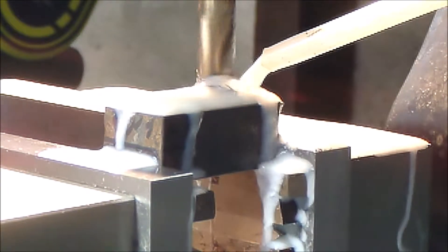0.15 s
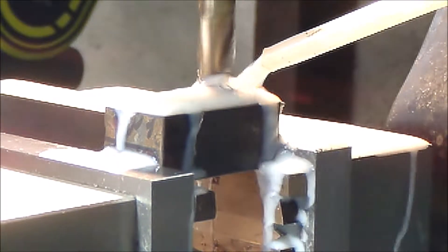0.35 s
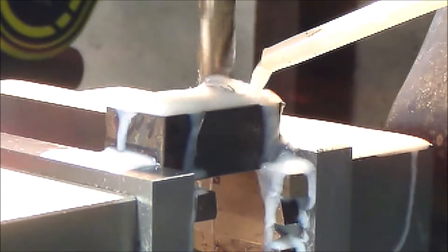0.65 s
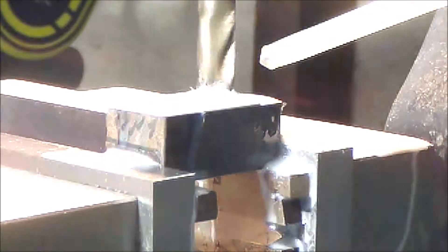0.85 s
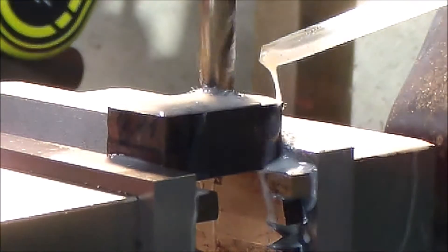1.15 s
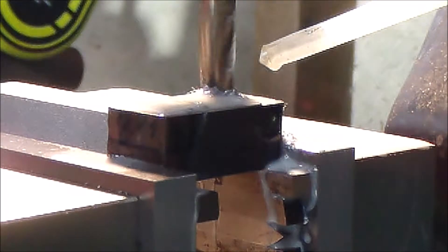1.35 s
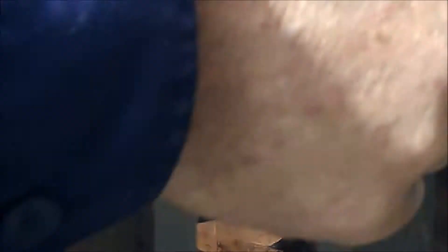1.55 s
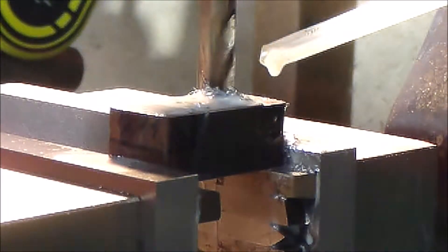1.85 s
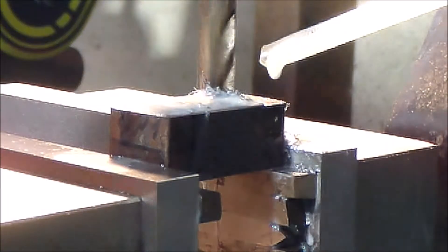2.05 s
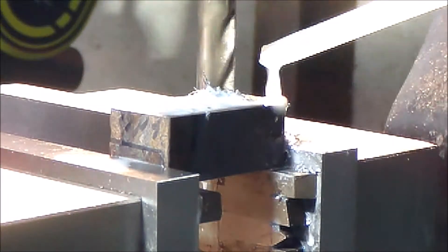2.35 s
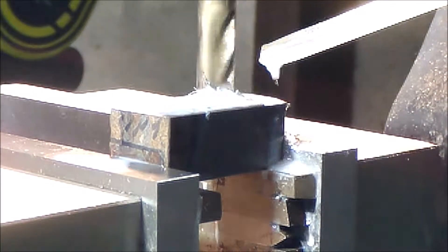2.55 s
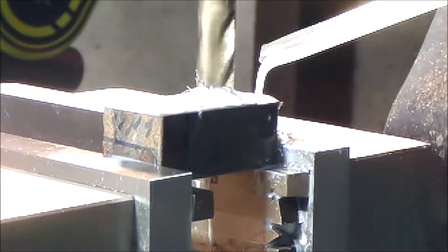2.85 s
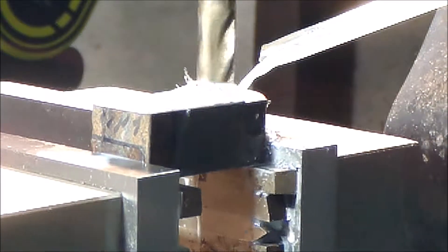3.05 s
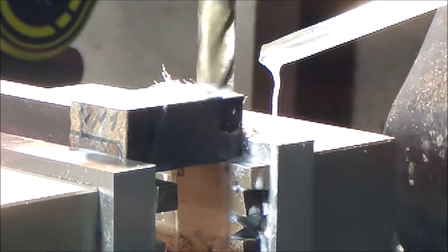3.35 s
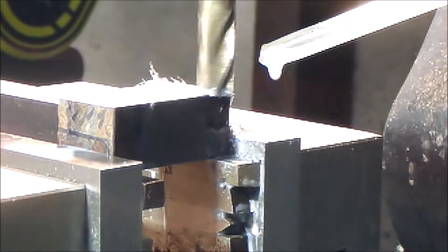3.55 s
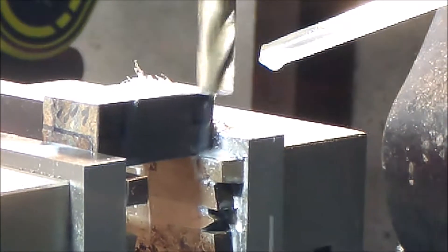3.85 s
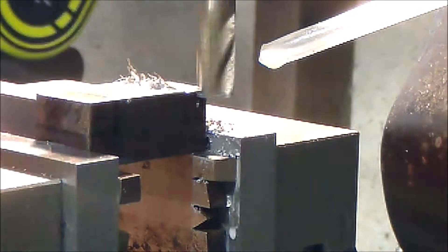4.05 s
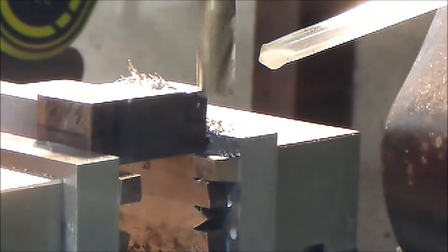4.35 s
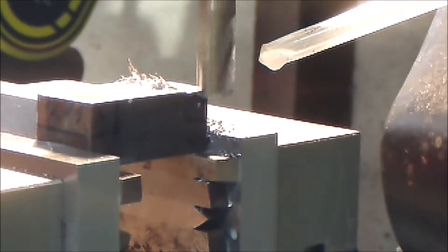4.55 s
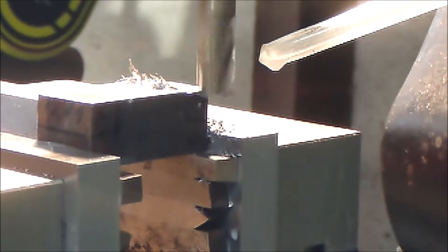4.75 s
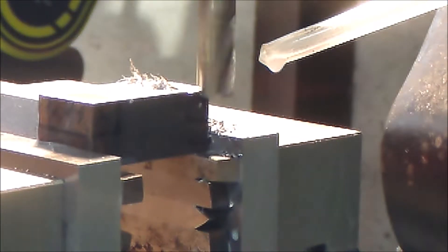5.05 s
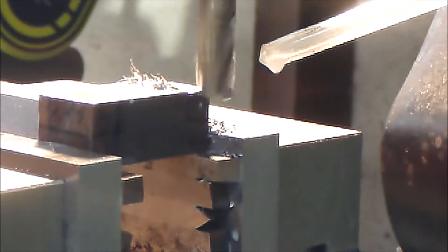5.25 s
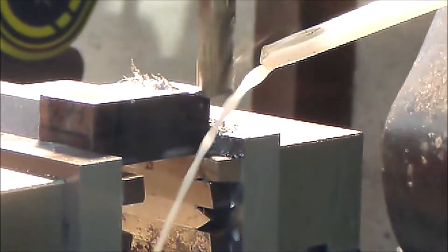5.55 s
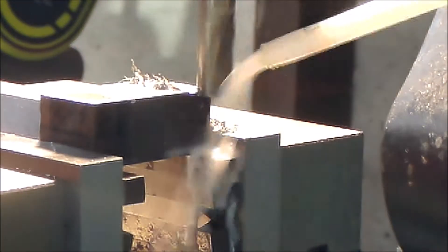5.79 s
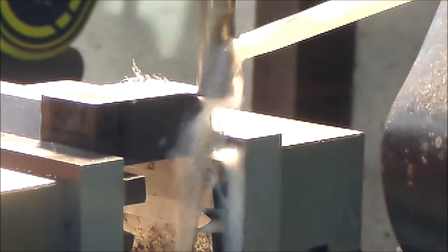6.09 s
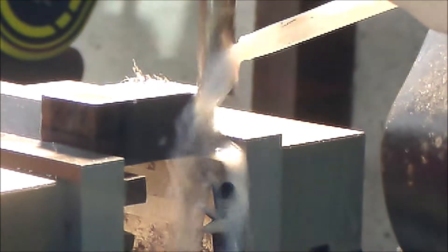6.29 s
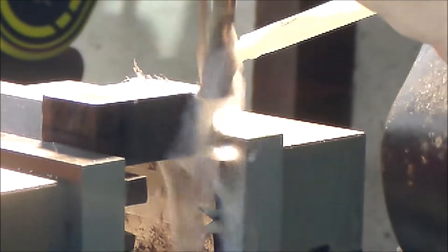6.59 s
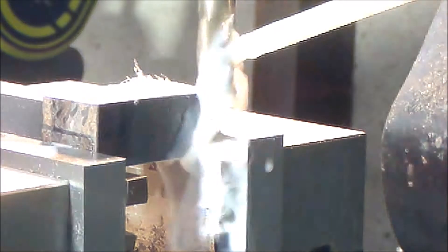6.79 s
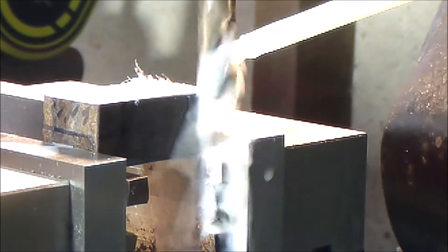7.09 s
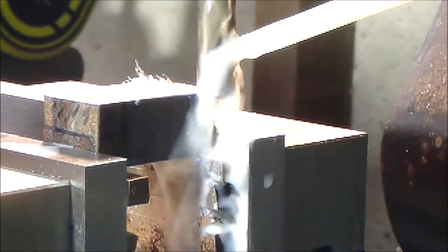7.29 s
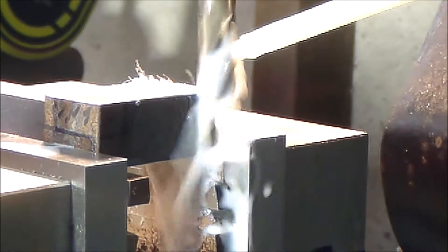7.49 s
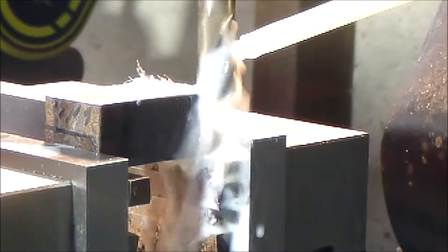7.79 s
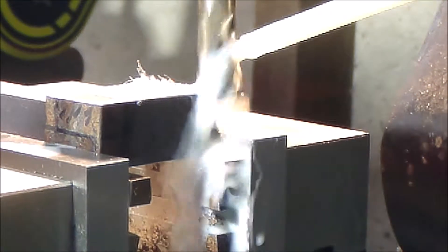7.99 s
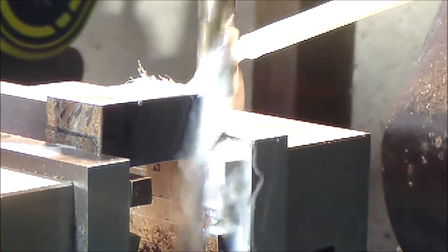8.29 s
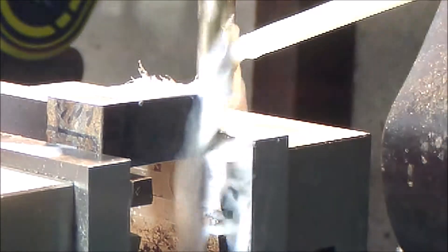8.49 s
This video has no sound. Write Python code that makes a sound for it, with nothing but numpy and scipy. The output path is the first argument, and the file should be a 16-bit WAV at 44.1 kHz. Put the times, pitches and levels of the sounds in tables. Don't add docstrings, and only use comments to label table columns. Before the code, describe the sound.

A loud milling machine whines and roars steadily in a workshop; a hand crank rattles, then the cutter bites metal with a ringing scrape.

```python
import sys
import numpy as np
from scipy import signal
from scipy.io import wavfile
from scipy.ndimage import uniform_filter1d

SR = 44100
rng = np.random.default_rng(int(sys.argv[2]) if len(sys.argv) > 2 else 0)


def file_out(sig):
    cols = np.atleast_2d(sig).T
    lim = np.clip(cols, -1, 1)
    pcm = np.round(lim * 32767).astype(np.int16)
    wavfile.write(sys.argv[1], SR, pcm)


def gain_from_db(level_db):
    decades = np.asarray(level_db, float) / 20
    return 10 ** decades


N = 380583
T = np.arange(N) / SR
PULL_HZ = 99.73


def evened(x):
    return x / np.sqrt(np.mean(x ** 2) + 1e-20)


def read(points, hz):
    point_hz, value = np.transpose(points)
    return np.interp(np.log(hz + 1), np.log(point_hz + 1), value)


def curves(rows):
    start_s, *columns = np.transpose(rows)
    return [np.interp(T, start_s, column) for column in columns]


def drift(hz):
    knots = rng.standard_normal(900)
    return np.interp(T * hz, np.arange(900), knots) * 1.2


def gate(start, length, rise, fall):
    return np.clip(np.minimum((T - start) / rise, 1 + (start + length - T) / fall), 0, 1)


def arch(start, length, blunt):
    return np.sin(np.pi * np.clip((T - start) / length, 0, 1)).clip(0) ** blunt


def tone(hz, db, waver_db, waver_hz, wobble):
    phase = 2 * np.pi * (np.cumsum(hz * np.ones(N)) / SR + rng.random())
    phase = phase + wobble * drift(waver_hz)
    return np.sqrt(2) * gain_from_db(db + waver_db * drift(waver_hz)) * np.sin(phase)


def bumps(modes, hz):
    return [(1 / (1 + (2 * (hz - mode_hz) / width_hz) ** 2), db) for mode_hz, width_hz, db in modes]


def bumps_db(modes, hz):
    return sum(bell * db for bell, db in bumps(modes, hz))


def noise(shape_db, patchy_db):
    hz = np.fft.rfftfreq(2048, 1 / SR)
    real, imaginary, patches = rng.standard_normal((N // 512 + 5, 1025, 3)).T
    patches = uniform_filter1d(patches, size=9, axis=0)
    patches = evened(uniform_filter1d(patches, size=6, axis=1))
    spectra = (real + 1j * imaginary) * gain_from_db(shape_db(hz)[:, None] + patchy_db * patches)
    return evened(signal.istft(spectra, nperseg=2048, noverlap=1536)[1][:N])


def gears(mesh_hz, table, moved):
    total = 0
    for multiple, *levels_db, change_db in table:
        for side, db in zip((0, -1, 1), levels_db):
            hz = multiple * mesh_hz + side * PULL_HZ
            total = total + tone(hz, db + change_db * moved, waver_db=0.34, waver_hz=9, wobble=0.22)
    return total


# start_s, first_mesh_hz, table_moved (0-1, how far aside)
GEAR_SPEED = [(0, 583.3, 0), (2.5, 583.2, 0), (4.2, 583.2, .2), (4.7, 582.6, 1), (5.6, 582.5, 1),
              (6.5, 582.9, 1), (8.63, 583.1, 1)]
# multiple, level_db, side_below_db, side_above_db, change_db (once the table has moved)
FIRST_MESH = [(3, -55, -45, -40.5, 2.5), (4, -25, -33, -39, 1), (5, -39, -45, -72, 2),
              (6, -39, -53, -46, -5), (7, -47.5, -51, -63, 0.5), (8, -47.5, -55, -77, -5),
              (9, -37.5, -44, -51, 0), (10, -34.5, -50.5, -51, 0.5), (11, -78, -78, -64, -1),
              (13, -69, -53.5, -68, -5)]
SECOND_MESH = [(2, -52, -57.5, -75, 0.5), (3, -53.5, -63.5, -57.5, -3), (4, -43, -61, -45, -12),
               (5, -28.5, -33.5, -36, 0.5), (6, -48, -49, -43, 5.5), (7, -59, -42, -41.5, -2),
               (8, -41.5, -65, -47, -4.5), (9, -51, -52, -60, -9)]
# pitch_hz, level_db, change_db (once the table has moved)
BEARING_TONES = [(1394, -53.0, 1.0), (1550, -58.0, -4.0), (2110, -40.0, 5.0), (2374, -41.0, -1.0),
                 (2584, -44.0, 1.0), (3401, -44.0, -10.0), (3784, -45.0, -2.0), (4533, -56.0, -2.0),
                 (4662, -54.0, 2.0), (4945, -47.0, 1.0), (5635, -42.0, 0.0), (5768, -44.0, 4.0),
                 (6130, -47.0, 2.0), (7480, -52.0, 3.0)]


def gear_whine():
    mesh_hz, moved = curves(GEAR_SPEED)
    second_hz = mesh_hz * .7065
    whine = gears(mesh_hz, FIRST_MESH, moved) + gears(second_hz, SECOND_MESH, moved)
    for hz, db, change_db in BEARING_TONES:
        whine += tone(hz, db + change_db * moved, waver_db=3.0, waver_hz=15, wobble=0.41)
    return whine


# pitch_hz, level_db (per Hz)
HEAD_ROAR = [(760, -47), (1300, -26), (1520, -25), (1620, -12), (1760, -13.5), (2020, 0), (2210, -10.5),
             (2280, -6), (2560, -6.5), (3400, -13.5), (4410, -21), (5780, -6.5), (8160, -24), (9250, -22),
             (15800, -36)]
# pitch_hz, width_hz, level_db
COVERS = [(765, 54, 7.5), (1608, 120, 2.5), (2097, 360, -4), (3005, 240, 3.5), (5265, 160, 4),
          (5960, 220, 2.5), (9430, 540, 5), (12020, 1140, 5.5)]
# pitch_hz, width_hz, level_db
NEARBY_WALLS = [(1954, 120.0, 6.5), (1973, 150, -7), (3850, 250.0, -4.5), (4060, 100.0, 6.5), (4270, 52, 7),
                (4900, 450, 0.5), (4800, 150.0, 5), (4855, 150, -7), (5670, 290, 4), (5950, 230.0, -8),
                (6340, 680, 1), (7200, 260.0, -5), (8910, 64, 10), (9260, 190, 1.5), (9120, 680, -3),
                (9930, 40, 9.5), (10800, 830, -5), (10560, 114, 6.5), (12220, 160, 3.5), (13500, 210, 6),
                (14400, 81, 5), (13700, 180.0, 3.5), (14150.0, 100.0, 4.8), (14830.0, 370, 5)]


def head_roar():
    moved = curves(GEAR_SPEED)[1]
    strain = gain_from_db(-24.5) + gain_from_db(-42) * cranking() + gain_from_db(-47) * moved
    grain_db = 1.7 * evened(uniform_filter1d(rng.standard_normal(1025), size=3))
    grain_db *= np.clip(np.linspace(-.6, 4, 1025), .25, 1)
    roar = noise(lambda hz: read(HEAD_ROAR, hz) + grain_db + bumps_db(COVERS + NEARBY_WALLS, hz),
                 patchy_db=1.03)
    pull = 2 * np.pi * PULL_HZ * T
    throb = 1 + 0.11 * np.cos(pull) + .08 * np.cos(3 * pull)
    return strain * gain_from_db(0.49 * drift(8)) * throb * roar


# pitch_hz, level_db (per Hz)
COLUMN = [(15, -66), (25, -35), (123, -17), (290, -18), (394, -4.5), (460, -18), (585, -15.5), (810, -7),
          (897, -7), (1220, -4.5), (1500, -6.5), (1950, -37), (3300, -120)]


def column_rumble():
    return gain_from_db(-45) * noise(lambda hz: read(COLUMN, hz) + bumps_db(COVERS, hz), patchy_db=1.9)


# pitch_hz, level_db (over load)
FEED_MOTOR = [(161.5, -5), (188.4, -0.5), (237.5, -.5), (1130, 10)]
# pitch_hz, level_db (over load)
LEAD_SCREW = [(318.5, 1), (345, 4.5), (478, 7.5), (557, -3), (640.6, 4.5), (753.7, 6)]
# pitch_hz, level_db (per Hz)
FEED_GROWL = [(60, -36), (150, -24), (290, -21), (330, -3.5), (400, 7.5), (480, -1.5), (530, -8.5),
              (900, -8), (1400, -28.5)]
# start_s, length_s (motor runs)
FEED_ON = [
    (-.8, 1.53),
    (4.765, 5),
]
# growl_db, tones_db
FEED_LEVELS = [
    (-50, -61.5),
    (-45.5, -59.5),
]


def feed():
    motor, screw = [sum(tone(hz, db, waver_db=2.5, waver_hz=7, wobble=0.21) for hz, db in table)
                    for table in (FEED_MOTOR, LEAD_SCREW)]
    growl = noise(lambda hz: read(FEED_GROWL, hz), patchy_db=1.0)
    jolt = gain_from_db(-43.5) * arch(2.83, 0.31, 2)
    out = growl * (gain_from_db(-66.5) + jolt + gain_from_db(-63) * cranking())
    take_up_s, coast_s, run_up_s, run_down_s, clutch_s = .12, .1, .16, .45, .04
    for (start, length), (growl_db, tones_db) in zip(FEED_ON, FEED_LEVELS):
        table = gate(start + take_up_s, length + coast_s - take_up_s, run_up_s, run_down_s) ** 2
        motor_on = gate(start, length, clutch_s, clutch_s)
        out = out + table * gain_from_db(growl_db) * growl
        out = out + gain_from_db(tones_db) * (table * screw + motor_on * motor)
    return out


# start_s, length_s, level_db
STEADY_HUMS = [
    (0.03, .8, -48.5),
    (.8, 1.45, -48),
    (2.25, .38, -39.5),
    (2.87, .21, -44),
    (3.92, .8, -50),
]
# start_s, length_s, top_db
HUM_SWELLS = [
    (4.91, .3, -38.5),
    (5.15, .78, -36.5),
    (5.84, 1.09, -35),
    (6.92, 1.0, -37),
    (7.94, 1.0, -36),
]


def hum():
    held = np.max([gain_from_db(db) * gate(start, length, .02, .09) for start, length, db in STEADY_HUMS], axis=0)
    swell = np.max([gain_from_db(db) * arch(start, length, .6) for start, length, db in HUM_SWELLS], axis=0)
    steady_tone = tone(399.6, 0, waver_db=-1.6, waver_hz=20, wobble=0.066)
    feeding_tone = tone(4 * PULL_HZ, 0, waver_db=0.4, waver_hz=21.34, wobble=.12)
    return held * steady_tone + swell * feeding_tone


# start_s, level_db, fade_s (time to fall 60 dB), scrape_s (length of the scrape)
CHIP_SNAPS = [
    (.678, -15, .03, .001),
    (2.446, -15.5, .07, .009),
]
# pitch_hz, level_db (per Hz)
SNAP_COLOUR = [(300, -23), (1300, -18), (2200, 4.5), (4000, -19), (5800, -8), (6700, -7.5), (8000, -6),
               (12000, -7.5), (16000, -12)]


def chips():
    crack = noise(lambda hz: read(SNAP_COLOUR, hz), patchy_db=5.5)
    shape = np.zeros(N)
    for start, db, fade_s, scrape_s in CHIP_SNAPS:
        tail = gain_from_db(db - 60 * np.clip(T - start - scrape_s, 0, 1) / fade_s)
        shape += (T > start) * tail * np.clip((T - start) / 0.00047, 0, 1)
    return signal.sosfilt(signal.butter(2, 600, "high", fs=SR, output="sos"), crack * shape)


# start_s, pitch_hz, level_db, fade_s (time to fall 60 dB)
KNOCK_TONES = [(5.922, 355, -22, .07), (5.922, 430, -26, .06), (2.4455, 2200, -10, .07),
               (2.446, 1900, -20, .04), (2.4468, 6600, -12, .05), (2.452, 7100, -14, .05),
               (.678, 2250, -25, .03), (.6783, 6400, -8, .016), (2.848, 2250, -17, .06),
               (2.89, 2950, -19, .05), (3.925, 2500, -15, .05)]


def knocks():
    total = np.zeros(N)
    for start, hz, db, fade_s in KNOCK_TONES:
        age = np.clip(T - start, 0, 1)
        build_up = np.sin(np.pi / 2 * np.clip(age * hz / 4, 0, 1)) ** 2
        total += gain_from_db(db - 60 * age / fade_s) * np.sin(2 * np.pi * hz * age) * build_up
    return total


# start_s, tooth_rate_hz
HAND_SPEED = [
    (2.76, 410),
    (2.95, 570),
    (3.06, 655),
    (3.33, 818),
    (3.55, 695),
    (3.72, 680),
    (3.93, 417),
    (3.98, 385),
]


def cranking():
    start, end = HAND_SPEED[0][0], HAND_SPEED[-1][0]
    return gate(start, end - start, .03, .01)


# middle_s, half_length_s, speed_lost (share)
HAND_CATCHES = [
    (2.857, .045, .235),
    (2.995, .035, .13),
    (3.47, .1, .14),
    (3.625, .065, .125),
]
# multiple, level_db
LOW_TEETH = [(1, 0), (1.28, -10), (2, 2)]
HIGH_TEETH = [(3, -12), (4, -6), (5, -3), (6, 3), (7, -8), (8, -3), (12, -6), (15, -10), (19, -11)]
# pitch_hz, width_hz, level_db
SADDLE_RINGS = [(760, 640, -3), (417, 200, 8), (953, 65, 5), (1400, 400, 1.5), (2220, 200, 14),
                (2600, 120, 8), (2960, 130, 11), (3314, 170, 11), (3770, 200, 6), (6050, 800, 11),
                (8300, 1500, 0), (12200, 500, -5), (14500, 2000, 7)]


def crank():
    slowed = 1 - sum(lost * arch(middle - half, 2 * half, 2) for middle, half, lost in HAND_CATCHES)
    tooth_hz = curves(HAND_SPEED)[0] * slowed * (1 + .007 * drift(40))
    effort_db = -44 + 24 * np.log2(tooth_hz / 700)
    chatter_db = -43.5 + 1.5 * drift(14)
    orders = [(multiple, db + effort_db, .9) for multiple, db in LOW_TEETH]
    orders += [(multiple, db + chatter_db, 1.1) for multiple, db in HIGH_TEETH]
    teeth = 0
    for multiple, db, wobble in orders:
        hz = multiple * tooth_hz
        ringing = sum(bell * gain_from_db(mode_db) for bell, mode_db in bumps(SADDLE_RINGS, hz))
        teeth = teeth + tone(hz, db, waver_db=3.3, waver_hz=80, wobble=wobble) * ringing
    return teeth * cranking()


# start_s, level_db
BITE = [
    (5.12, -43),
    (5.18, -34),
    (5.6, -27),
    (6.2, -25.5),
    (7.8, -23.8),
    (8.1, -27.5),
    (8.63, -24.5),
]
# pitch_hz, width_hz, level_db
BAR_RINGS = [(2543, 110, 6), (2985, 190, -5.5), (2148, 610, -5), (3177, 220, -5), (1730, 92, -30)]


def cutter():
    ring = noise(lambda hz: 20 * np.log10(sum(bell * gain_from_db(db) for bell, db in bumps(BAR_RINGS, hz))),
                 patchy_db=0.5)
    return gain_from_db(curves(BITE)[0] + 1.95 * drift(45)) * ring * (T > BITE[0][0])


def scene():
    machine = gear_whine() + head_roar() + column_rumble() + feed() + hum()
    return np.tile(machine + chips() + knocks() + crank() + cutter(), (2, 1))


STARVED_EARLY = [62, 133, 142, 148, 150, 154, 157, 164, 183, 222, 229, 253]
STARVED_LATER = [269, 275, 287, 295, 305, 314, 316, 323, 349, 369, 378]
STARVED_TWICE = [144, 170, 278, 309, 385]
# pitch_hz, step_db
ROUNDING = [(100, -15), (1000, -14), (2500, -8), (5500, -10.5), (9000, -12), (15000, -21)]


def starved(x):
    frame_s = 1024 / 48000
    hop = round(frame_s * SR)
    n = np.arange(2 * hop) + .5
    k = np.arange(hop)[:, None] + .5
    window = np.sqrt(2 / hop) * np.sin(np.pi * n / (2 * hop))
    waves = window * np.cos(np.pi / hop * (n + hop / 2) * k)
    step = gain_from_db(read(ROUNDING, k * SR / (2 * hop)))
    frames = np.array(STARVED_EARLY + STARVED_LATER + STARVED_TWICE)
    middle = np.round((frames + .16) * frame_s * SR).astype(int)
    middle = np.append(middle, middle[-len(STARVED_TWICE):] + hop)
    at = middle - hop + np.arange(2 * hop)[:, None]
    terms = waves @ x[at]
    rounded = np.sign(terms) * step * np.floor(abs(terms / step) ** .75 + .4) ** (4 / 3)
    out = x.copy()
    np.add.at(out, at, waves.T @ (rounded - terms))
    return out


def low_pass(x):
    return signal.sosfilt(signal.butter(12, 15910, fs=SR, output="sos"), x)


def record(dry):
    treble_cut = signal.firwin(801, 15740, window=("kaiser", 9), fs=SR)
    heard = signal.oaconvolve(starved(dry[0]), treble_cut, "same")
    return low_pass(np.tile(heard, (2, 1)))


dry = scene()
out = record(dry)
file_out(out)
```